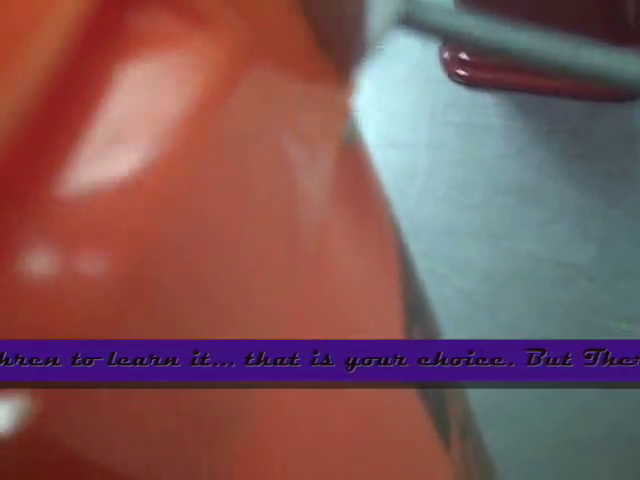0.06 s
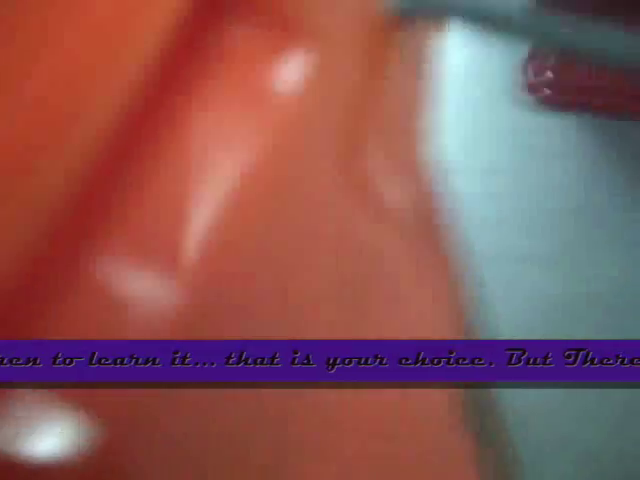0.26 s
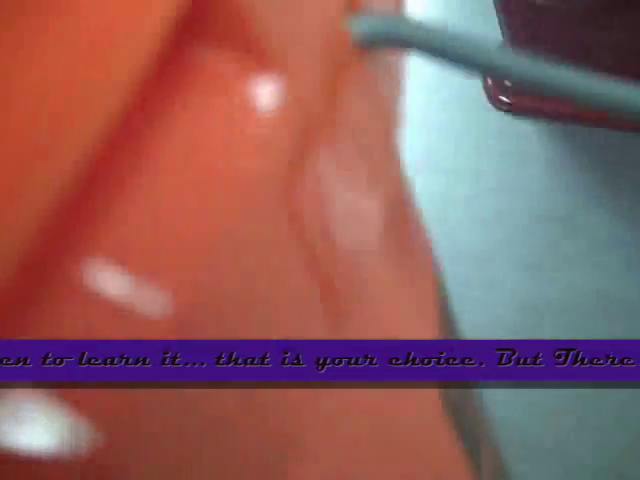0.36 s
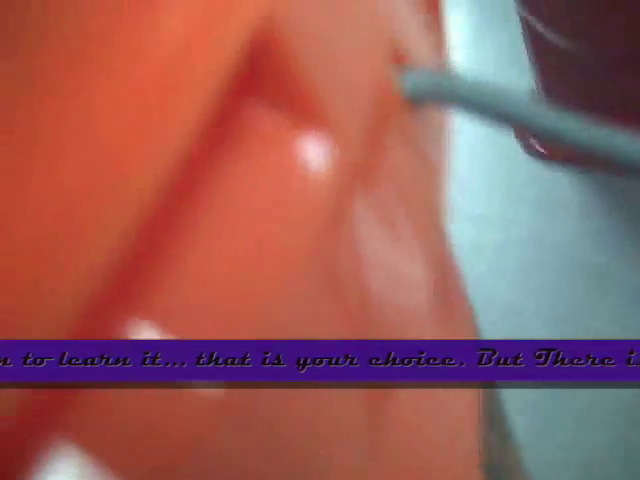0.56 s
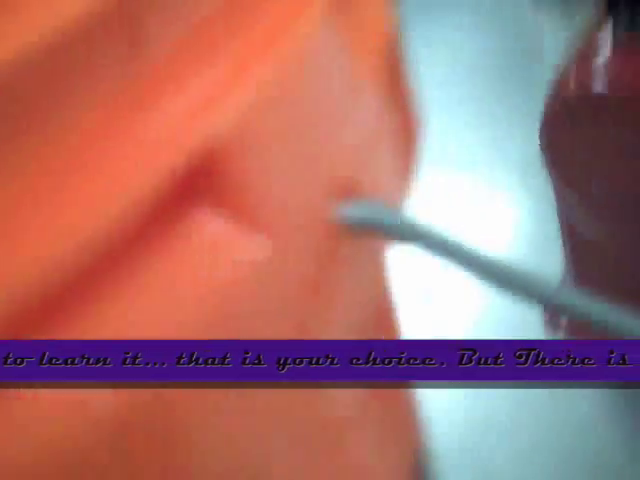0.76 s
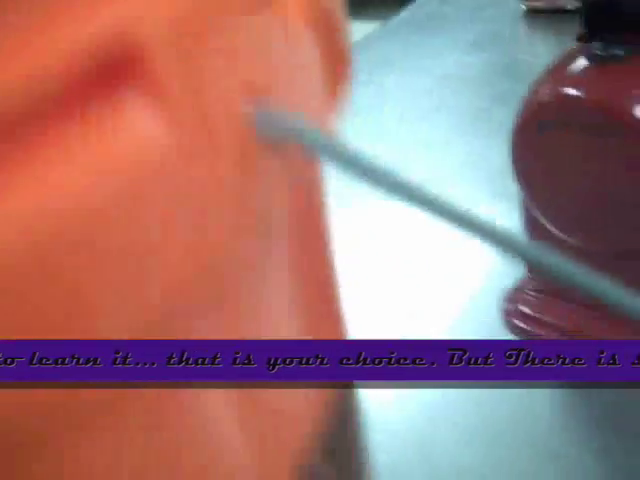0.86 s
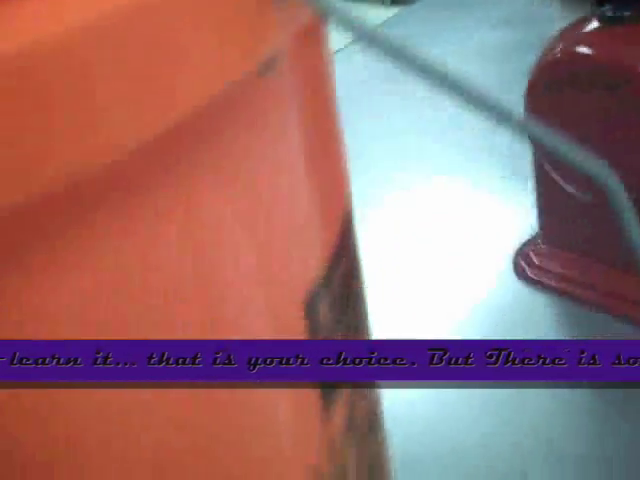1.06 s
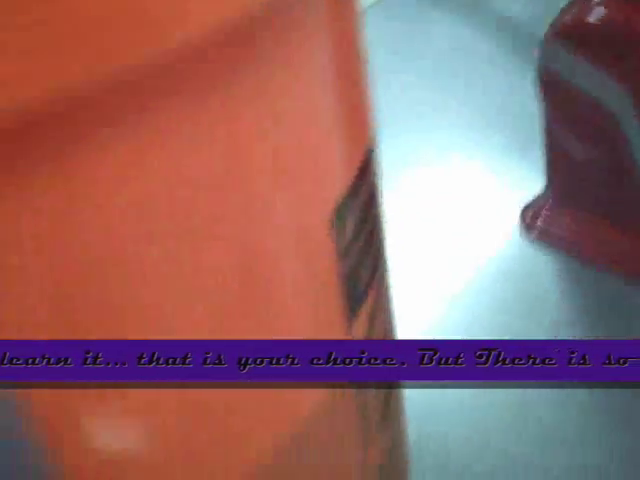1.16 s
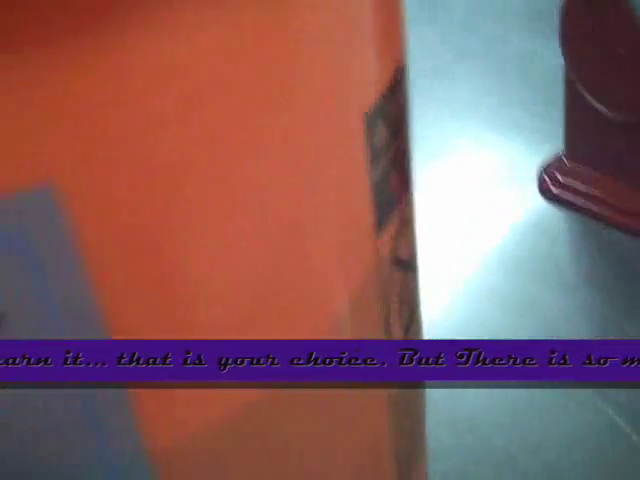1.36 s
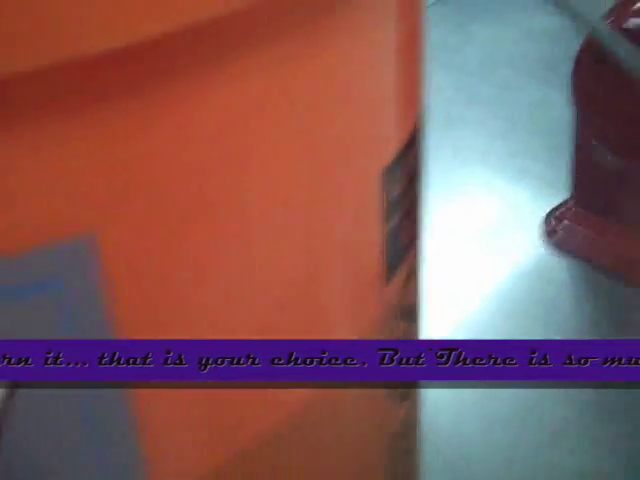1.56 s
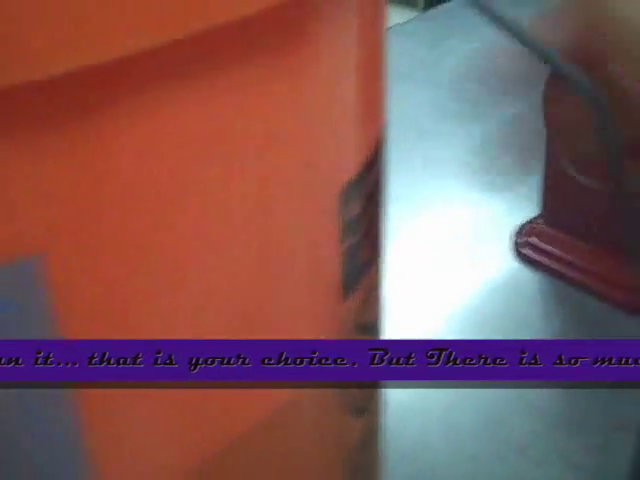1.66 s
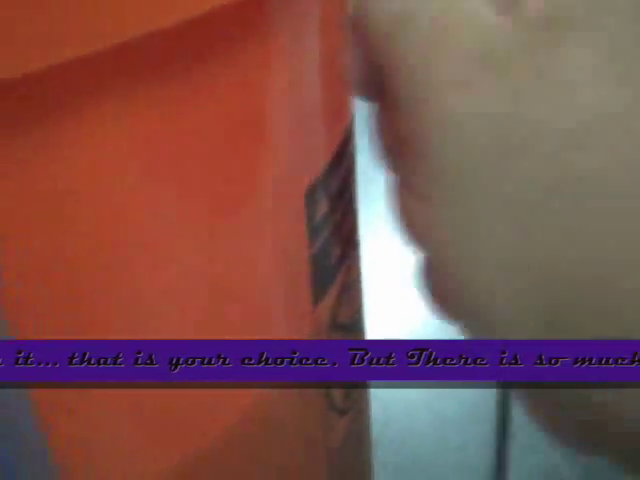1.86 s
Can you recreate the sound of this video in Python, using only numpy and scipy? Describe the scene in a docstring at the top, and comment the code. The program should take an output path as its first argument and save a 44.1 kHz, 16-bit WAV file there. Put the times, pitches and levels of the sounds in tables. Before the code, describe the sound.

Close to one microphone in a hard-walled room, a steel hook knocks through a plastic bucket's lug in a fast hollow clatter, taps and scrapes faintly on the rim, then the loose wire clinks and rattles.

```python
"""A plastic bucket, close to one microphone in a hard-walled room, as its steel wire handle is unhooked.
The hook knocks through the lug in a quick cluster: damped noise bursts, wall modes and a low thump.
The held wire springs; then the hook taps and scrapes softly on the rim: short sines and grainy noise.
Last the loose wire clinks, rings and rattles to rest, as bright clicks and decaying steel modes.
Coloured noise and faint steady tones make the room noise that lies underneath."""
import sys
import numpy as np
from scipy import signal
from scipy.fft import rfft, irfft, next_fast_len
from scipy.io import wavfile

SR = 44100
rng = np.random.default_rng(int(sys.argv[2]) if len(sys.argv) > 2 else 0)


def store_wav(level_fs):
    """Save 16-bit WAV to argv[1]."""
    pcm = np.round(np.clip(np.atleast_2d(level_fs), -1, 1) * 32767)
    wavfile.write(sys.argv[1], SR, pcm.T.astype(np.int16))


N = 83790


def amp(db):
    """Decibels to gain."""
    return 10 ** (np.asarray(db) / 20)


def unit(x):
    """Scale to rms 1."""
    return x / np.sqrt(np.mean(x ** 2) + 1e-20)


def along(points, hz):
    """Read a curve of (freq_hz, value) points, interpolated on a log frequency axis."""
    freq_hz, value = np.transpose(points)
    return np.interp(np.log(hz + 1), np.log(freq_hz + 1), value)


def noise(colour):
    """White noise filtered to a colour, with rms 1."""
    spectrum = rfft(rng.standard_normal(N))
    gain = amp(along(colour, np.fft.rfftfreq(N, 1 / SR)))
    return unit(irfft(spectrum * gain, N))


def fade(t60):
    """Exponential decay from time zero, by 60 dB in t60 seconds."""
    return np.exp(-np.log(1000) * np.arange(N) / SR / t60)


def tone(hz, turn=0):
    """A sine that starts at a given share of its cycle."""
    return np.sin(2 * np.pi * (hz * np.arange(N) / SR + turn))


def burst(colour, t60):
    """Dense, heavily damped ringing: coloured noise under a decay, with a fixed energy."""
    shape = fade(t60) * (1 - fade(0.003))
    return unit(noise(colour) * shape) * np.sqrt(np.mean(shape ** 2))


WANDER_TURNS, WANDER_PER_S = 0.019, 110  # phase unsteadiness: spread in cycles, new values per second


def ring(modes, count=512):
    """Damped modes, excited a little differently by each blow and slightly unsteady in phase."""
    knots = np.arange(N) / SR * WANDER_PER_S
    out = np.zeros(N)
    for hz, db, t60 in modes:
        wander = WANDER_TURNS * np.interp(knots, np.arange(count), rng.standard_normal(count))
        strength = amp(db + rng.standard_normal())
        out += strength * tone(hz, rng.random() + wander) * fade(t60)
    return out


def add(track, s, sound):
    """Mix a sound in at time s."""
    i = max(round(s * SR), 0)
    track[i:] += sound[:N - i]


# how long the room rings: freq_hz, t60_s
ROOM_DECAY = [(100, 0.17), (350, 0.48), (1000, 0.41), (2500, 0.36), (5000, 0.32), (14000, 0.11)]
ROOM_BUILD_S = 0.04  # time constant of the build-up


def room(x, level):
    """Diffuse answer of the room: a noise tail in which each frequency dies at its own speed."""
    hz, t, grains = signal.stft(rng.standard_normal(SR), SR, nperseg=256)
    t60 = along(ROOM_DECAY, hz)[:, None]
    shape = np.exp(-np.log(1000) * t / t60) * (1 - np.exp(-t / ROOM_BUILD_S))
    # equal energy at every frequency, before the level curve
    shape = shape / np.sqrt(SR * np.mean(shape ** 2, axis=1, keepdims=True))
    gain = amp(along(level, hz))[:, None]
    tail = signal.istft(grains * shape * gain, SR, nperseg=256)[1]
    return signal.fftconvolve(x, tail)[:N]


# colour of the soft rush in the room: freq_hz, density_db
RUSH_COLOUR = [(25, -6), (50, -30.5), (95, -31), (135, -9), (200, -13.5), (270, -7.5), (420, -7.5),
               (560, -4), (700, -1), (1020, -11), (2100, -20.5), (3200, -26), (6000, -38), (15000, -40)]
# level of the rush and its tones: time_s, level_db
RUSH_LEVEL = [(0, -43.5), (.2, -45.5), (.45, -53), (.7, -54.5), (1.05, -51.5), (1.4, -52), (1.9, -52.5)]
# steady tones in the rush: freq_hz, level_db relative to the rush
HUM_TONES = [(262, -15), (571, -9), (693, -4)]
# colour of the thin hiss: freq_hz, density_db
HISS_COLOUR = [(300, -15.5), (1500, 5.5), (2800, -5), (5000, -13.5), (9000, -17), (15000, -30)]
# level of the hiss: time_s, level_db
HISS_CURVE = [(0, -47.5), (.18, -45.5), (.6, -55.5), (1.1, -70.5), (1.38, -57.5), (1.9, -50.5)]


def level_curve(points):
    """Gain over time from (time_s, level_db) points."""
    return amp(np.interp(np.arange(N) / SR, *np.transpose(points)))


def room_noise():
    """A soft noise rush with faint steady sines, and a thin hiss that sinks away and returns."""
    rush = noise(RUSH_COLOUR)
    for hz, db in HUM_TONES:
        rush += amp(db) * tone(hz, rng.random())
    return level_curve(RUSH_LEVEL) * rush + level_curve(HISS_CURVE) * noise(HISS_COLOUR)


# heavily damped hollow modes of the bucket's body: centre pitch_hz, level_db, t60_s
BODY_MODES = [(272, -2, 0.055), (468, -5, 0.037), (700.5, -1, 0.038), (809, -0.5, 0.05)]
# colour of the dull puff: freq_hz, density_db
THUMP_COLOUR = [(20, -11), (60, -3.5), (130, 7), (250, -1), (600, -22), (2000, -49.5)]
THUMP_DB, BODY_DB, THUMP_T60_S = -7.5, -3, 0.029  # base levels, to which each blow adds its own


def body(thump_db, hollow_db):
    """The whole bucket gives under a blow: a dull puff and a few short, hollow modes."""
    hollow = np.zeros(N)
    for hz, db, t60 in BODY_MODES:
        shifted_hz = hz * (1 + 0.029 * rng.standard_normal())
        hollow += amp(db) * tone(shifted_hz) * fade(t60)
    hollow *= 1 - fade(0.0094)  # soft onset
    puff = burst(THUMP_COLOUR, THUMP_T60_S)
    return amp(THUMP_DB + thump_db) * puff + amp(BODY_DB + hollow_db) * hollow


# hook on plastic: start_s, level_db, pitch_hz of the struck spot, then offsets from the base levels:
# thump_db, hollow_db, scrape_db (bright), ring_db (bucket wall)
HOOK_KNOCKS = [(0.15, -38, 3270, -16, -4, -11.5, 2.5), (0.2112, -18.5, 3070, -8.5, -20, 5, -4.5),
               (0.2144, -10.5, 3393, -11, -23, -7, -6), (.226, -18.5, 2380, -12.5, -9, 1, -8.5),
               (0.2301, -8, 2490, -21, -9.5, -10, -6.5), (0.2369, -7, 2555, -32, -44, -15.5, -12.5),
               (0.2426, -16, 2850, -22.5, -31, -9.5, -7.5), (0.252, -18.5, 2400, -25, -5.5, -20, -4.5),
               (0.2765, -7, 3240, -5.5, 2.5, -2.5, -10.5), (0.2831, -8.5, 1740, -17, -8, -16.5, 1.5),
               (0.2903, -14, 2585, -6, -5, -19.5, -6.5), (0.3, -8, 2505, -2.5, 2, -7.5, -3.5),
               (0.313, -15, 2640, -30, -3, -6.5, -10.5), (0.333, -11, 1890, -44, -14.5, -13.5, -11.5),
               (0.364, -24, 2270, -6, 3.5, 1.5, 4), (0.3698, -26.5, 2080, -12, -27, 11.5, 10),
               (0.3868, -12, 2510, -5, -3.5, -6.5, 1.5), (.397, -15.5, 1400, -35.5, -14, -8.5, 9.5),
               (.41, -23.5, 1240, -25, -24, -11.5, -7.5), (0.43, -26.5, 2480, -25, -27, -5.5, -2.5),
               (0.478, -27, 2400, -25, -28, -12, -23.5), (0.4968, -23.5, 2420, -41, -20.5, -12, -7),
               (.511, -22.5, 2596, -34, -23, -10, -5.5), (.561, -35.5, 1530, -24, 4, -16.5, -3),
               (0.7509, -48.5, 1610, -15.5, -15, -4.5, -6.5), (1.83, -32.5, 2620, -37, -35, -4, -3)]
# modes of the bucket wall, with one low mode of the room near 321 Hz: pitch_hz, level_db
WALL_MODES = [(145, -12.5), (255, -15), (321, -4), (780, -17), (1130, -4.5), (1285, 2), (1373, 1.5),
              (1475, 2.5), (1808, -7.5), (1846, -2.5), (2229, -2.5), (2425, 4), (2550, 4), (2955, 1.5)]
# colour of the crack in the plastic: freq_hz, density_db
PLASTIC_COLOUR = [(60, -40), (250, -1.5), (750, 1.5), (1050, -1), (1500, 7), (2600, -0.5), (3600, -2.5),
                  (4800, -15.5), (9000, -40), (15000, -45)]
# colour of the bright scrape: freq_hz, density_db
SCRAPE_COLOUR = [(500, -13), (3000, 3.5), (5000, 2.5), (8000, 0), (10500, -5), (13000, -1.5),
                 (15500, -12.5)]
# room answer to knocks and to the held wire: freq_hz, level_db
KNOCK_ROOM_LEVEL = [(60, -37), (300, -15), (1500, -12), (3000, -12), (6000, -11), (14000, -8)]
KNOCK_DB, BUCKET_DB, SPOT_DB, SCRAPE_DB = -0.5, -23, 5, -5
KNOCK_T60_S, SPOT_T60_S, SCRAPE_T60_S = 0.032, 0.016, 0.038
BUCKET_T60_S, BUCKET_DAMPING = 0.21, 0.13  # ring time of the wall at 1 kHz; higher modes die sooner


def bucket_knocks():
    """Each knock cracks the plastic wall, rings the struck spot, the bucket and a low room mode, and thumps the
    body."""
    out = np.zeros(N)
    wall_modes = [(hz, db, BUCKET_T60_S * (1000 / hz) ** BUCKET_DAMPING) for hz, db in WALL_MODES]
    for s, db, hz, thump_db, hollow_db, scrape_db, ring_db in HOOK_KNOCKS:
        crack = amp(KNOCK_DB) * burst(PLASTIC_COLOUR, KNOCK_T60_S)
        wall = amp(BUCKET_DB + ring_db) * ring(wall_modes)
        spot = amp(SPOT_DB) * tone(hz) * fade(SPOT_T60_S) * (1 - fade(0.002))
        scrape = amp(SCRAPE_DB + scrape_db) * burst(SCRAPE_COLOUR, SCRAPE_T60_S)
        hit = amp(db) * (crack + wall + spot + scrape + body(thump_db, hollow_db))
        add(out, s, hit + room(hit, KNOCK_ROOM_LEVEL))
    return out


# the held wire springs in its lug: start_s, level_db
WIRE_SPRINGS = [(0.3339, -33.5), (.396, -35.5)]
# modes of the wire while it is still held in the lug: pitch_hz, level_db, t60_s
HELD_WIRE_MODES = [(4495, -7, 0.39), (5160, -4.5, 0.18), (3120, -5, .25), (12650, -8.5, .2)]


def held_wire():
    """The wire's damped modes ring faintly each time it springs in its lug."""
    out = np.zeros(N)
    for s, db in WIRE_SPRINGS:
        add(out, s, amp(db) * ring(HELD_WIRE_MODES))
    return out + room(out, KNOCK_ROOM_LEVEL)


# light taps of the hook on the rim: start_s, level_db, pitch_hz, t60_s
RIM_TAPS = [(0.814, -41.5, 1356, 0.13), (0.811, -45, 2500, 0.071), (.833, -43.5, 2500, 0.1),
            (.818, -62, 5023, 0.2), (0.61, -61, 2800, 0.36), (.896, -45.5, 2550, 0.033),
            (1.0222, -34, 2500, 0.021), (1.026, -41, 2460, 0.058)]
TAP_RISE_S = 0.0025  # the onset is complete to within 60 dB


def rim_taps(room_db=-23):
    """A light touch rings only one spot of the rim: a single decaying sine."""
    out = np.zeros(N)
    for s, db, hz, t60 in RIM_TAPS:
        add(out, s, amp(db) * tone(hz) * fade(t60) * (1 - fade(TAP_RISE_S)))
    return out + room(out, [(2000, room_db)])


# colour of the hook sliding along the rim: freq_hz, density_db
SLIDE_COLOUR = [(300, -12.5), (900, 1), (1350, 2), (1900, 0), (2500, 0), (3300, -9.5), (5200, -28.5),
                (8000, -29), (15000, -44.5)]
SLIDE_S, SLIDE_DB = 0.813, -48
SLIDE_RISE_S, SLIDE_HOLD_S, SLIDE_T60_S = 0.0025, 0.031, 0.13  # onset time constant, hold, decay
SLIPS_PER_S, SLIP_DB = 327, 1  # how often and how strongly the friction changes


def rim_slide(count=1024):
    """Steel catches and slips on plastic: a short noise scrape made grainy by random friction."""
    since = np.maximum(np.arange(N) / SR - SLIDE_S, 0)
    rise = 1 - np.exp(-since / SLIDE_RISE_S)
    decay = np.exp(-np.log(1000) * np.maximum(since - SLIDE_HOLD_S, 0) / SLIDE_T60_S)
    friction = np.interp(since * SLIPS_PER_S, np.arange(count), rng.standard_normal(count))
    slips = amp(SLIP_DB * friction)
    return amp(SLIDE_DB) * rise * decay * slips * noise(SLIDE_COLOUR)


HOOK_FREE_S, HOOK_CAUGHT_S = 1.469, 1.514  # the hook springs clear, then touches again

# contacts of the loose wire: start_s, level_db, then ring_db (wire), thump_db, hollow_db
# (offsets from the base levels) and room_db (offset from the room curve)
WIRE_CONTACTS = [(1.408, -26.5, 11, 4.5, -24, -12.5), (1.414, -29.5, -4, -4, -26, -17),
                 (1.4653, -15, -22, -27, -3, -5.5), (1.481, -18, -4, -3, -6, -2.5),
                 (1.5231, -34, -12, -26, 8, 0.5), (1.566, -28, 2, -32, -22, 2.5),
                 (1.597, -21.5, -6, -29, -9.5, -4.5), (1.607, -25.5, 1, -18, -5.5, 1),
                 (1.641, -38, 15.5, -24, -13, -2), (1.671, -25, -4, -29, -4, 0.5),
                 (1.68, -27.5, -10, -25, -26, -1), (1.693, -35, 0, -49, -2, 0.5),
                 (1.72, -34.5, -9, -17, 4, 2.5), (1.749, -36.5, 2, -27, -10, -6.5),
                 (1.838, -37, -17, -29, -26, -3)]
# modes of the wire bow while its hook still rests on the lug: pitch_hz, level_db, t60_s
RESTING_MODES = [(2347, -8, .26), (3203, 2, .22), (3973, -1, .12), (4608, -10, .09), (5496, -1, .3),
                 (6702, -5, .17), (7784, -2, .13), (9162, -9, .14), (10640, -3, .13), (11910, -13, .13),
                 (12430, -9, .15), (13870, -6, .14)]
# modes of the wire bow once it is unhooked: pitch_hz, level_db, t60_s
FREE_MODES = [(3203, -5, .45), (3984, -5, .2), (4204, -11, .25), (5497, 1, .18), (6503, -2, .22),
              (7962, -5, .2), (9162, -10, .15), (10540, -10, .17), (11500, -4, .2), (12670, -11, .2),
              (13890, -10, .2)]
# colour of the steel click: freq_hz, density_db
STEEL_COLOUR = [(80, -25.5), (300, -1.5), (750, 1.5), (1200, 1), (2500, 0), (4000, -5), (6000, -2.5),
                (8000, -2.5), (10000, -9), (14000, -7), (15500, -18)]
# room answer to the clinks: freq_hz, level_db
CLINK_ROOM_LEVEL = [(60, -16), (300, 4.5), (800, 0.5), (1500, -2), (3000, -3.5), (6000, -4.5), (14000, -4)]
CLINK_DB, WIRE_DB, CLINK_T60_S = 1.5, -16, 0.057


def wire_clinks():
    """Each contact of the loose wire is a bright click that rings the bow anew and nudges the bucket."""
    out = np.zeros(N)
    for s, db, ring_db, thump_db, hollow_db, room_db in WIRE_CONTACTS:
        modes = RESTING_MODES if s < HOOK_FREE_S else FREE_MODES
        bow = amp(WIRE_DB + ring_db) * ring(modes)
        clink = amp(CLINK_DB) * burst(STEEL_COLOUR, CLINK_T60_S) + bow
        answer = amp(room_db) * room(clink, CLINK_ROOM_LEVEL)
        add(out, s, amp(db) * (clink + body(thump_db, hollow_db) + answer))
    return out


# modes of the hook end as it springs clear: pitch_hz, level_db
HOOK_MODES = [(4595, 2), (6230, -3), (10610, -17), (12437, -13)]
HOOK_DB, HOOK_RISE_S = -20, 0.038  # the rise is a time constant
HOOK_T60_S, HOOK_CAUGHT_T60_S = 0.97, 0.026  # free decay, and the extra damping once caught


def hook_ping(room_db=-8.0):
    """The hook end sings as steady modes while it is free and is damped when it touches again."""
    t = np.arange(N) / SR
    since_caught = np.maximum(t - (HOOK_CAUGHT_S - HOOK_FREE_S), 0)
    caught = np.exp(-np.log(1000) * since_caught / HOOK_CAUGHT_T60_S)
    rise = 1 - np.exp(-t / HOOK_RISE_S)
    ping = sum(amp(db) * tone(hz) for hz, db in HOOK_MODES) * fade(HOOK_T60_S) * rise * caught
    out = np.zeros(N)
    add(out, HOOK_FREE_S, amp(HOOK_DB) * (ping + room(ping, [(5000, room_db)])))
    return out


def scene():
    """Bucket, handle and room at one microphone."""
    bucket = bucket_knocks() + rim_taps() + rim_slide()
    wire = held_wire() + wire_clinks() + hook_ping()
    return (room_noise() + bucket + wire)[None]


CEILING, TOP_HZ = 1.0, 15650  # largest peak before the band limit (full scale = 1), and that limit


def record(dry):
    """The recorder rounds off the highest peaks and keeps nothing above its band limit."""
    held = dry / (1 + np.abs(dry / CEILING) ** 6) ** (1 / 6)
    size = next_fast_len(N + SR // 2)
    in_band = np.fft.rfftfreq(size, 1 / SR) < TOP_HZ
    return irfft(rfft(held, size) * in_band, size)[..., :N]


dry = scene()
out = record(dry)
store_wav(out)
```